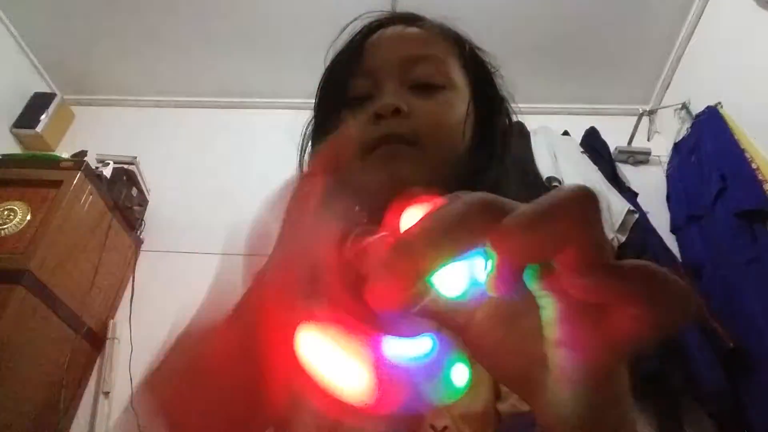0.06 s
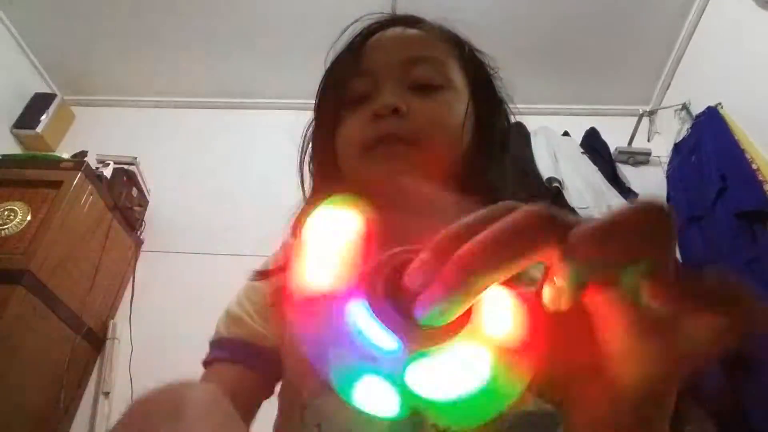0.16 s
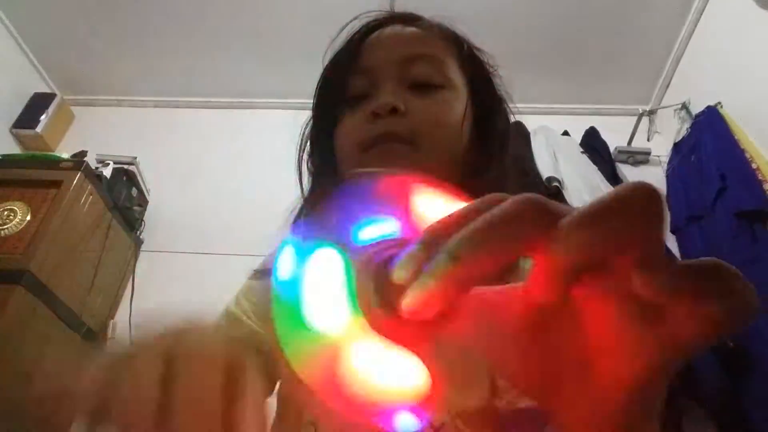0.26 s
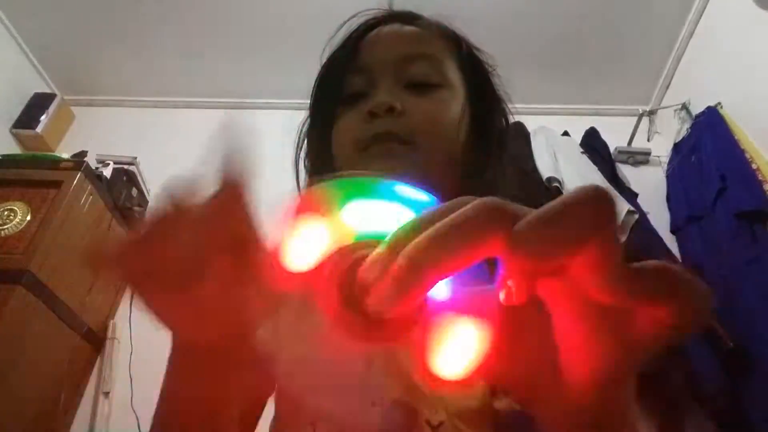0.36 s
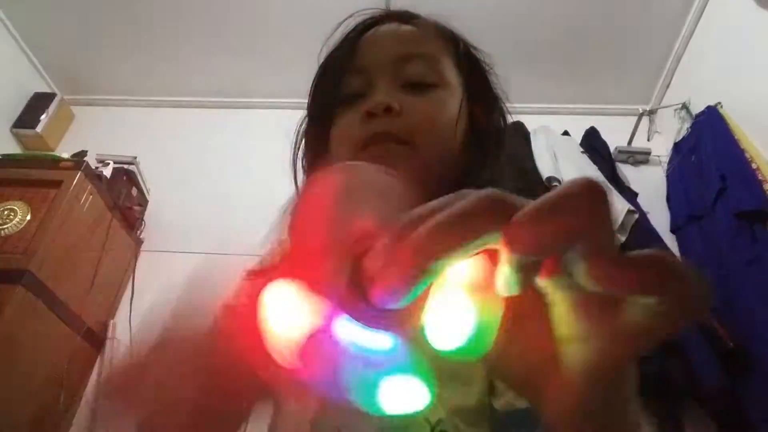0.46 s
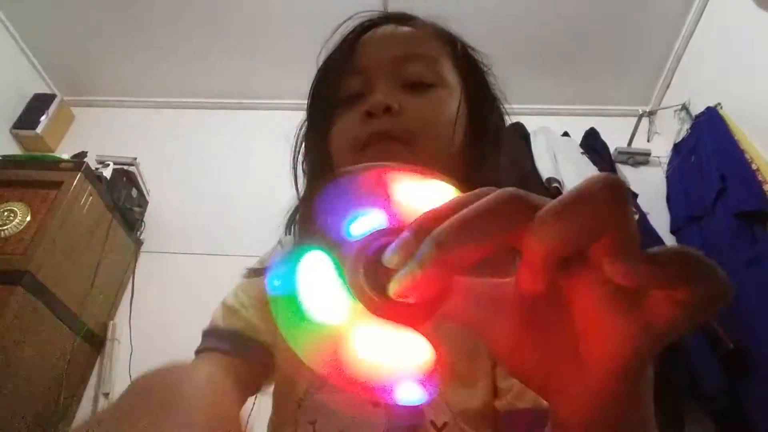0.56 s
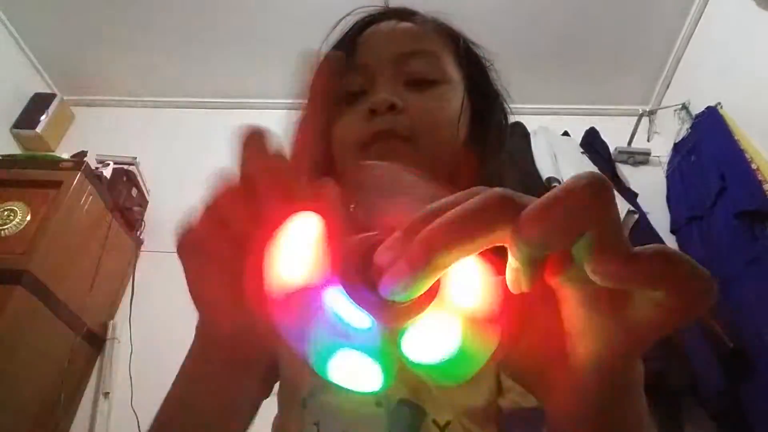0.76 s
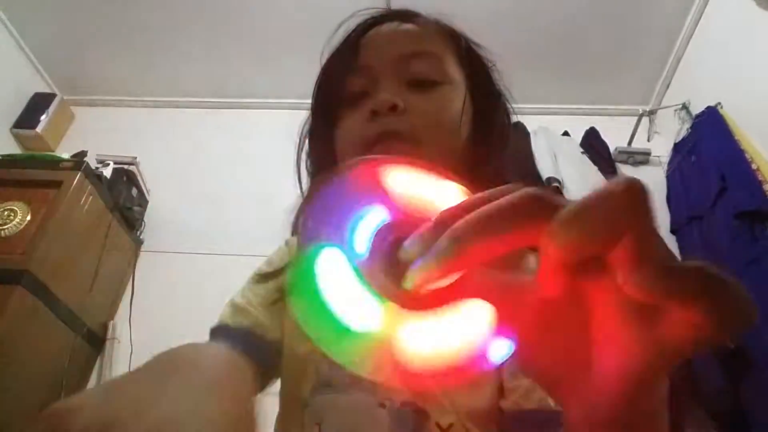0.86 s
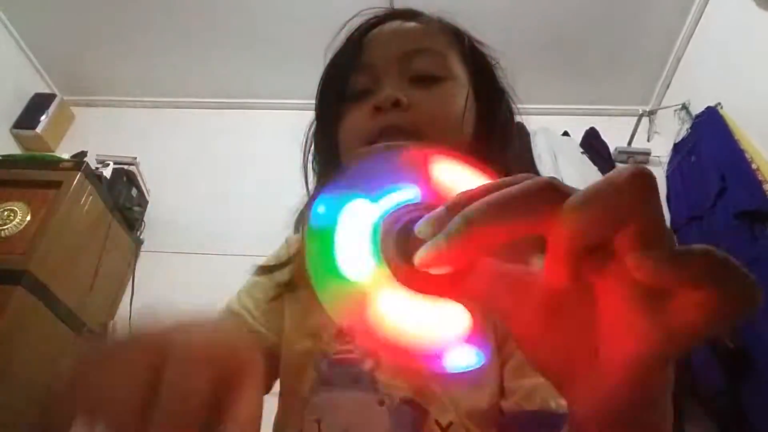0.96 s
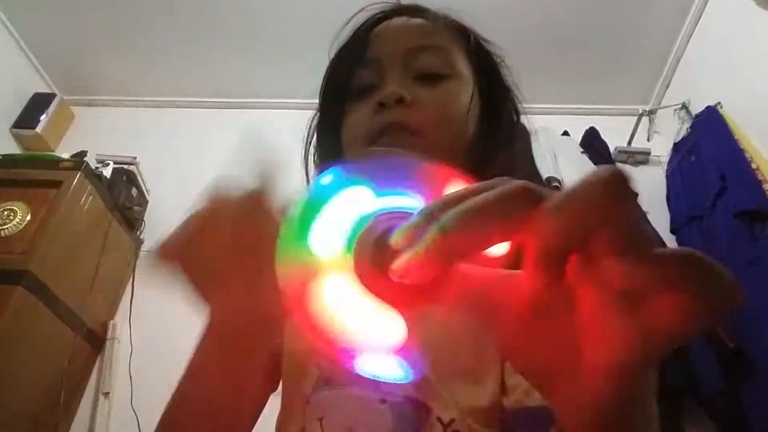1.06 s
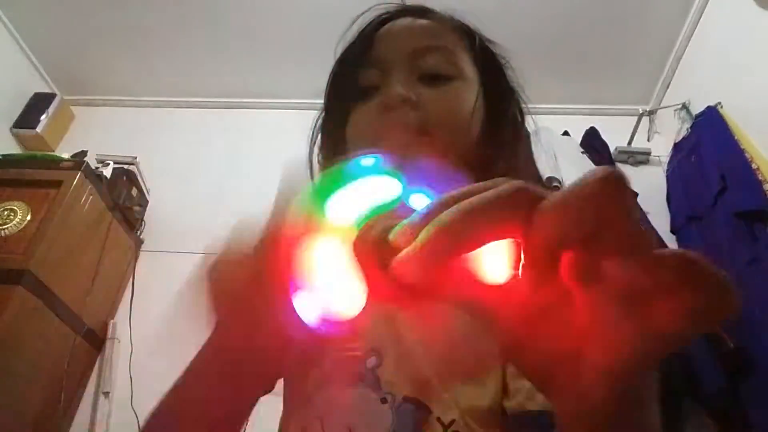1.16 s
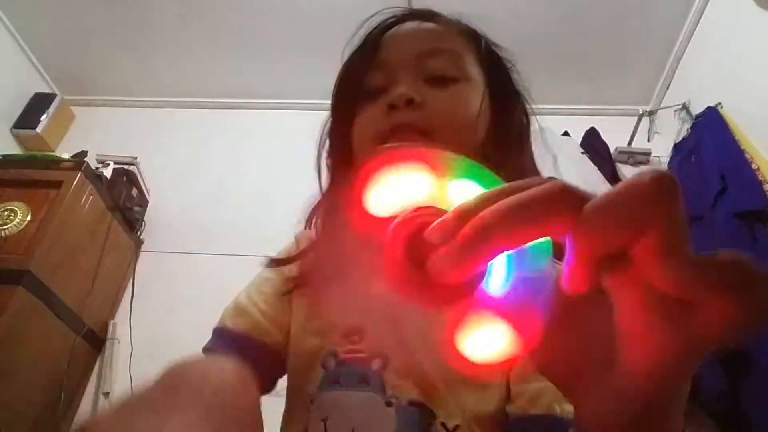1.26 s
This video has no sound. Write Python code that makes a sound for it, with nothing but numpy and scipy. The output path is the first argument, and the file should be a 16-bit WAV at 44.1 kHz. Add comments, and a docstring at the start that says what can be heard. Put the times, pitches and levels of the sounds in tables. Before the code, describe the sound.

Fingers flick a small plastic spinner, giving three clusters of bright clicks in a quiet room

```python
"""A plastic toy spinner is flicked three times close to the microphone in a small room with a low hum.
A few light clicks come first; at 0.22, 0.61 and 0.97 s each flick knocks the loose body against its hub
in a cluster of ringing clicks. In between, the bearing rattles faintly at the same high ring.
At 0.69 s a finger brushes past with two puffs of air; near 1.2 s the low drone swells and the whine rises.
Clicks are short bursts of tone and filtered noise; the rattle, brush and room are shaped noise."""
import sys
import numpy as np
from scipy import signal
from scipy.fft import rfft, irfft
from scipy.io import wavfile

SR = 44100
rng = np.random.default_rng(int(sys.argv[2]) if len(sys.argv) > 2 else 0)


def to_wav(s):
    """Save 16-bit WAV."""
    ch = np.atleast_2d(s).T  # columns
    pcm = np.round(np.clip(ch, -1, 1) * 32767)  # PCM
    wavfile.write(sys.argv[1], SR, pcm.astype(np.int16))


N = 57330  # samples, 1.3 s

WHINE_HZ = 5350  # the bearing's ring, also the pivot of the shell's brightness tilt


def undb(db):
    """Turn decibels into a gain."""
    return 10 ** (np.asarray(db) / 20)


def unit(x):
    """Scale to an rms (average strength) of 1."""
    return x / np.sqrt(np.mean(x ** 2))


def spectrum_hz(size):
    """Frequencies of a spectrum, kept at 1 Hz or more so that logarithms work."""
    return np.maximum(np.fft.rfftfreq(size, 1 / SR), 1)


def noise(points):
    """Steady noise of rms 1, coloured by (f/Hz, level/dB) points joined on a log-frequency scale."""
    hz, db = np.array(points).T
    gain = undb(np.interp(np.log(spectrum_hz(N)), np.log(hz), db))
    return unit(irfft(rfft(rng.standard_normal(N)) * gain, N))


def hump(t, at, spread, db):
    """A bell-shaped swell and fall around one moment."""
    return undb(db) * np.exp(-((t - at) / spread) ** 2 / 2)


def curve(t, points):
    """Gain over time through (t/s, level/dB) points joined by straight lines in dB."""
    return undb(np.interp(t, *np.array(points).T))


def resonance(f, hz, width):
    """Response of one damped mode, gain 1 at its centre."""
    return 1j * f * width / (hz ** 2 - f ** 2 + 1j * f * width)


def background(t):
    """Dull room noise and a wavering electrical hum; the low drone swells once."""
    # room noise colour: f/Hz, level/dB per Hz
    air_colour = [(25, -14), (45, -5), (70, -3), (110, 0.5), (180, 0.5), (290, -0.5), (380, -7),
                  (550, -6.5), (900, -16), (1800, -23), (2700, -19), (4000, -25), (15000, -38)]
    # lines of the electrical hum: f/Hz, level/dB
    hum_lines = [(250.6, -72), (299.5, -65.5), (500, -83)]
    # one swell of the drone: t/s, bell spread/s, level/dB
    swell = (1.218, 0.056, -62.5)
    # colour of that swell: f/Hz, level/dB
    swell_colour = [(120, -26), (230, -7), (295, -1.5), (380, -24), (1500, -26), (6000, -46)]
    air_db, hum_waver = -60.5, 0.3  # waver: rms change as a share of the hum's level
    out = undb(air_db) * noise(air_colour) + hump(t, *swell) * noise(swell_colour)
    for hz, db in hum_lines:
        waver = 1 + hum_waver * noise([(1, -19), (12, 17), (50, -39), (200, -93)])
        tone = np.sin(2 * np.pi * (hz * t + rng.random()))
        out = out + np.sqrt(2) * undb(db) * waver * tone
    return out


def room(x, t, db):
    """Bare walls return a short diffuse tail, duller than the direct sound."""
    t60_s, delay_s = 0.089, 0.0024  # time to fall by 60 dB, wait before the tail
    top_hz = 9500  # the walls swallow the highest treble
    tail = rng.standard_normal(N) * undb(-60 * t / t60_s) * (t > delay_s)
    tail = tail / np.sqrt(np.sum(tail ** 2))
    tail = signal.sosfilt(signal.butter(2, top_hz, fs=SR, output="sos"), tail)
    return x + undb(db) * signal.fftconvolve(x, tail)[:N]


def finger(t):
    """Skin brushes the rim, then moved air pushes and pulls at the microphone."""
    # brush on the rim: t/s, bell spread/s, level/dB
    brush = (.693, 0.0077, -50)
    # colour of the brush: f/Hz, level/dB
    brush_colour = [(200, 13), (600, 12), (1200, -8.5), (2600, 1.5), (5000, 3.5), (8500, -9.5),
                    (15000, -29)]
    # puffs of air: t/s, time from middle to peak/s, peak level/dB
    puffs = [(.6992, 0.0019, -43), (.7205, 0.0022, -46)]
    out = hump(t, *brush) * noise(brush_colour)
    for k, (at, half, db) in enumerate(puffs):
        u = (t - at) / half
        pulse = u * np.exp((1 - u ** 2) / 2)
        out = out + (-1) ** k * undb(db) * pulse  # every other puff is turned over
    return out


def shell(x, tilt_db=0):
    """Pass a contact force through the plastic shell's resonances; a harder contact tilts it brighter."""
    # shell resonances: f/Hz, distance from centre to half amplitude/Hz, level/dB
    shell_modes = [(710, 1250, -23), (1680, 400, -17.5), (2557, 156, -11), (3350, 515, -8), (5177, 396, 5),
                   (6204, 220, 0), (7240, 630, -10), (8210, 560, -7.5), (11050, 330, -17),
                   (16100, 380, -25)]
    floor_db = -32.5  # broadband snap between the resonances
    f = spectrum_hz(len(x))
    power = undb(floor_db) ** 2
    for hz, half_width, db in shell_modes:
        power = power + undb(db) ** 2 * abs(resonance(f, hz, 2 * half_width)) ** 4
    octaves = np.log2(np.maximum(f, 800) / WHINE_HZ)  # no further tilt below 800 Hz
    log_gain = np.log(power * undb(tilt_db * octaves) ** 2) / 2
    # fold the cepstrum so that the filter answers after the force, not before it (minimum phase)
    cepstrum = irfft(log_gain, len(x))
    cepstrum[1:len(x) // 2] *= 2
    cepstrum[len(x) // 2:] = 0
    return irfft(rfft(x) * np.exp(rfft(cepstrum)), len(x))


def bearing(t):
    """Balls scuff the race in tiny grains; their smooth rolling keeps its narrow ring going as a whine."""
    # rattle, harder after each flick: t/s, level/dB
    rattle_level = [(0, -63.5), (.11, -70), (.2, -68), (.25, -61), (.295, -51.5), (.36, -63), (.46, -63.5),
                    (.59, -67), (.65, -59.5), (.78, -66), (.89, -69.5), (.95, -69.5), (1.0, -53.5),
                    (1.06, -59), (1.14, -69.5), (1.19, -62.5), (1.3, -64)]
    # whine: t/s, level/dB
    whine_level = [(0, -81), (.1, -61), (.2, -71), (.56, -70), (.66, -65), (.76, -69.5), (1.14, -75),
                   (1.178, -57.5), (1.205, -59), (1.24, -74), (1.3, -56.5)]
    hits_per_s, scatter_db = 720, 3.5
    grain_s = 0.00096  # twice the time a grain takes to peak
    whine_half_width_hz = 220  # distance from centre to half amplitude
    hits = (rng.random(N) < hits_per_s / SR) * undb(scatter_db * rng.standard_normal(N))
    age = 2 * t / grain_s
    grain_power = signal.fftconvolve(hits ** 2, (age * np.exp(-age)) ** 2)[:N]
    grains = np.sqrt(abs(grain_power)) * rng.standard_normal(N)
    mode = resonance(np.fft.rfftfreq(N, 1 / SR), WHINE_HZ, 2 * whine_half_width_hz)
    whine = unit(irfft(rfft(rng.standard_normal(N)) * mode ** 2, N))
    return curve(t, rattle_level) * unit(shell(grains)) + curve(t, whine_level) * whine


def body(t):
    """Each flick sounds the body's lowest mode, a hollow knock that dies at once in the hand."""
    # flicks: t/s, level before the decay/dB
    flicks = [(.2165, -44.5), (.6098, -59), (.9688, -46.5)]
    body_hz, decay_s = 660, 0.001
    out = np.zeros(N)
    for at, db in flicks:
        age = np.maximum(t - at, 0)
        out += np.sqrt(2) * undb(db) * np.exp(-age / decay_s) * np.sin(2 * np.pi * body_hz * age)
    return out


def clicks(size=2048):
    """Each knock chatters for some milliseconds: the hub's clean ring, plus a crack with a broad second mode."""
    # knocks of the body on its hub: t/s, contact length/ms, ring f/Hz, ring level/dB, crack level/dB,
    # crack tilt/dB per octave, f of a second mode favoured by the point of contact/Hz, its level/dB
    knocks = [ (0.0338, 1, 5300, -48.5, -53.5, -4, 7850, -60.5),
              (0.095, 2.8, 5380, -48.5, -57, 2.5, 8140, -67),
              (0.2166, 2.74, 5690, -38.5, -38, 1, 6570, -41.5),
              (0.219, 4.5, 5440, -39.5, -44, 4, 3520, -52), (0.2252, 4.9, 5400, -49, -69, -1, 8150, -68),
              (0.2568, 1.5, 5560, -56, -49.5, -8, 8100, -51),
              (0.2613, 2.85, 4980, -27, -31.5, 0, 6240, -32),
              (0.2623, 2.17, 5560, -46, -31.5, -1, 6770, -33.5),
              (0.2722, 3, 5600, -54, -44, -2.5, 6400, -49),
              (0.2758, 1.55, 5400, -35.5, -38.5, 0, 8060, -44),
              (0.2985, 4.6, 5400, -67, -51, -6.5, 2770, -58), (0.314, 0.73, 5500, -62, -42, 0, 15000, -57),
              (0.3183, 1.04, 5700, -37, -39, 1.5, 3250, -50.5),
              (0.3272, 1.16, 6000, -45, -47, -4, 7100, -60), (0.3348, 2, 5300, -44, -48.5, -1, 2850, -68),
              (0.4085, 3.3, 5450, -48.5, -53, -3.5, 2634, -58),
              (0.4412, 2.5, 5200, -54, -60, -7, 6260, -65), (0.5123, 2.7, 4980, -45, -52, -1, 5680, -53),
              (0.6096, 2.22, 6000, -38.5, -35.5, -4.5, 3250, -41),
              (0.6128, 4, 5310, -36, -43.5, 6, 9700, -57.5), (0.6281, 1.3, 5040, -27, -35, -1, 2240, -51),
              (0.6304, 2.4, 5200, -54, -40.5, 0.5, 2400, -70), (0.638, 2.6, 5230, -44, -48.5, 9, 6230, -52),
              (0.6422, 1.3, 5360, -39, -53, -1, 4740, -52), (0.6685, 2.7, 5130, -48, -61, -2, 6200, -58),
              (0.735, 2.2, 5680, -52, -48, 1.5, 6270, -55.5), (0.914, 2.4, 5450, -54.5, -72, 4, 8240, -76),
              (0.9686, 3.3, 5214, -34, -42, -2, 4750, -52), (0.9845, 3.5, 5334, -38, -45.5, 1, 7300, -51.5),
              (0.9856, 1.4, 5300, -51, -42.5, 1, 14800, -50.5), (0.9955, 1.7, 5230, -44, -50, 8, 8540, -66),
              (1.032, 5, 6040, -59, -54.5, -3, 3870, -63.5),
              (1.072, 4.5, 5290, -46.5, -55.5, -2, 5900, -57), (1.0864, 1.3, 5100, -48, -53, -5, 2870, -62),
              (1.0968, 4.2, 5130, -48, -55, -1, 7960, -63), (1.2852, 2.4, 4950, -50.5, -70, 3, 5800, -61)]
    attack_s, release_s = 0.0006, 0.00049  # a knock swells, chatters, and is damped by the fingers
    second_q = 10  # centre over width of the resonance, which is applied twice
    rings, cracks = np.zeros((2, N + size))
    t = np.arange(size) / SR
    f = np.fft.rfftfreq(size, 1 / SR)
    for start, ms, hz, ring_db, crack_db, tilt_db, second_hz, second_db in knocks:
        after = np.maximum(t - ms * 1e-3, 0)  # time since the contact ended
        swell = np.sin(np.pi / 2 * np.minimum(t / attack_s, 1)) ** 2
        contact = swell * np.exp(-after / release_s)
        chatter = contact * rng.choice([-1, 1], (2, size))
        crack = undb(crack_db) * unit(shell(chatter[0], tilt_db))
        mode = resonance(f, second_hz, second_hz / second_q) ** 2
        second = undb(second_db) * unit(irfft(rfft(chatter[1]) * mode))
        i = int(start * SR)
        rings[i:i + size] += np.sqrt(2) * undb(ring_db) * contact * np.sin(2 * np.pi * hz * t)
        # scaled so that the levels hold during the contact, not over the whole window
        cracks[i:i + size] += np.sqrt(np.mean(contact ** 2)) * (crack + second)
    return rings[:N], cracks[:N]


def scene():
    """The spinner in the room, the passing finger and the background."""
    # the hub's ring beams at the microphone and reaches the walls weakly
    ring_room_db, room_db = -11.5, -8.5
    t = np.arange(N) / SR
    rings, cracks = clicks()
    spinner = room(rings, t, ring_room_db) + room(cracks + body(t) + bearing(t), t, room_db)
    return (background(t) + finger(t) + spinner)[None]


def record(dry):
    """The recorder cuts the deepest bass and the top."""
    low_cut_hz, top_hz = 43, 15900
    bass_cut = signal.butter(4, low_cut_hz, "high", fs=SR, output="sos")
    top_cut = signal.ellip(10, .2, 70, top_hz, fs=SR, output="sos")
    # the bass cut runs forwards and backwards, so it shifts nothing in time
    thin = signal.sosfiltfilt(bass_cut, dry, padtype="even", padlen=SR // 4)
    return signal.sosfilt(top_cut, thin)


dry = scene()
out = record(dry)
to_wav(out)
```